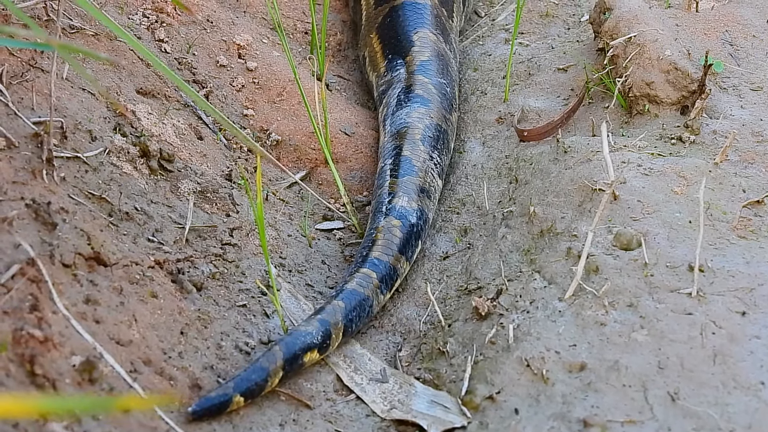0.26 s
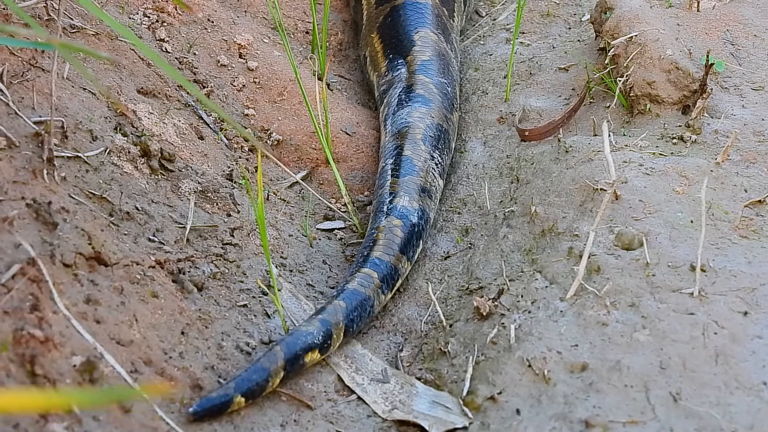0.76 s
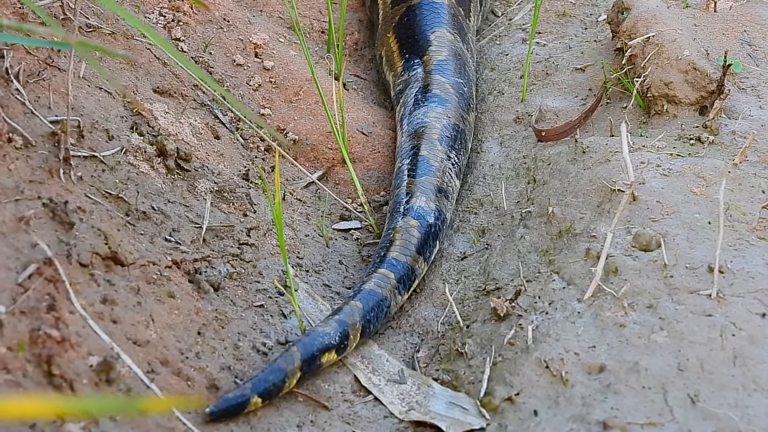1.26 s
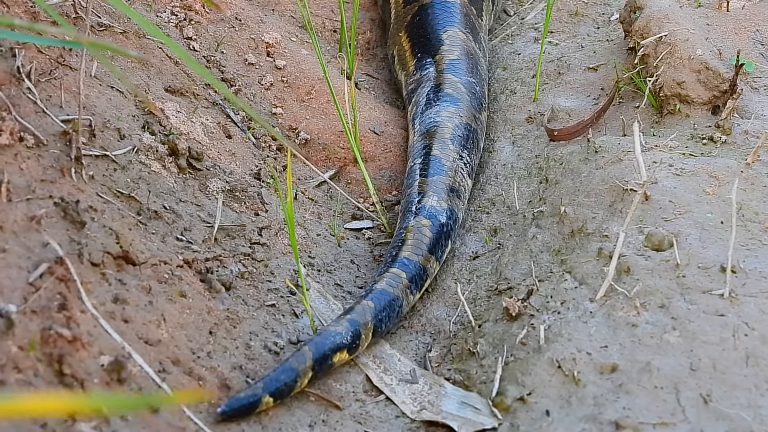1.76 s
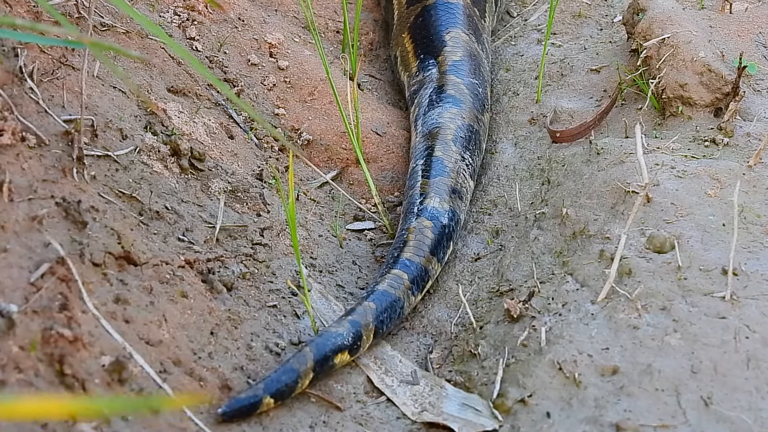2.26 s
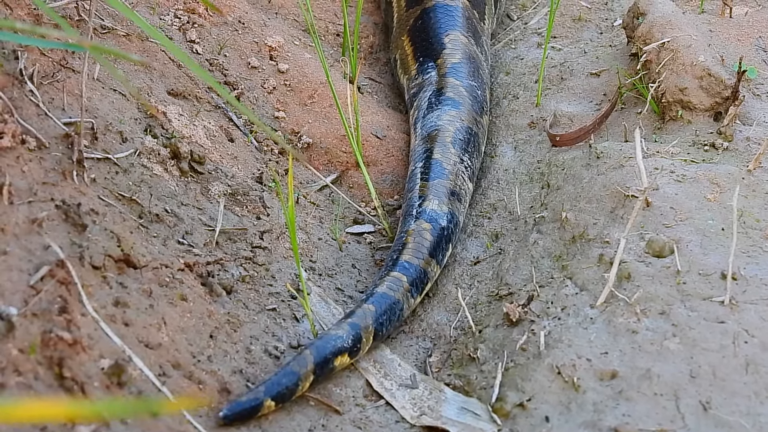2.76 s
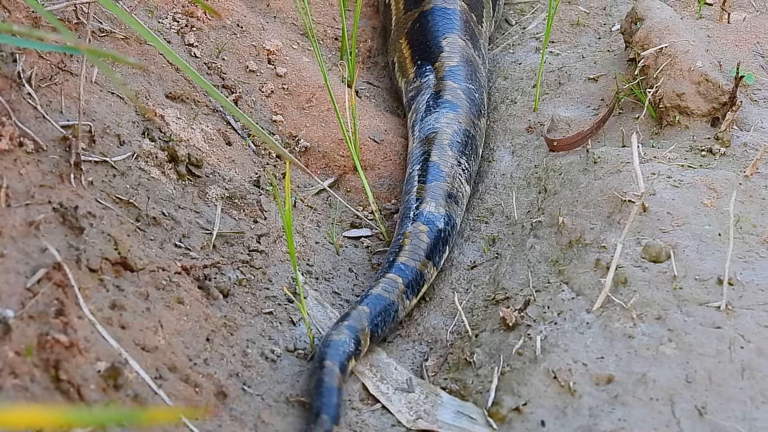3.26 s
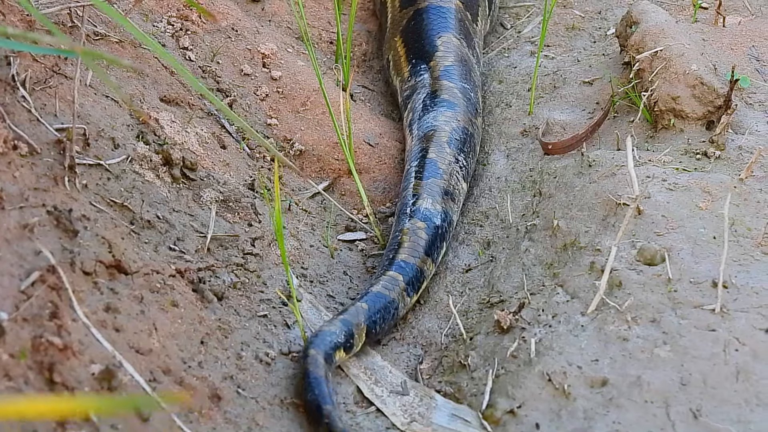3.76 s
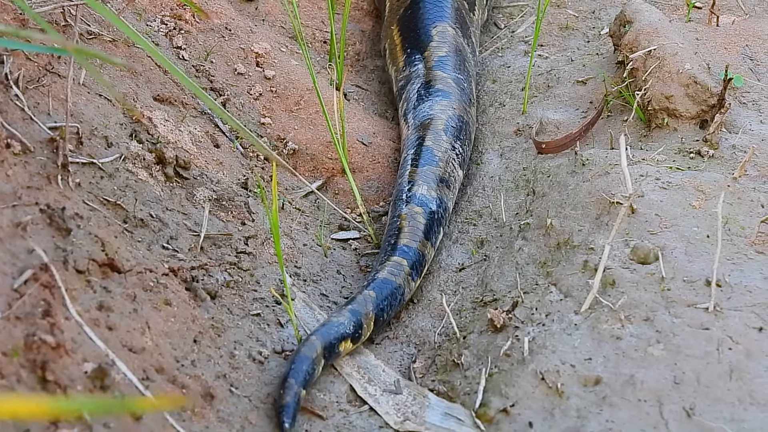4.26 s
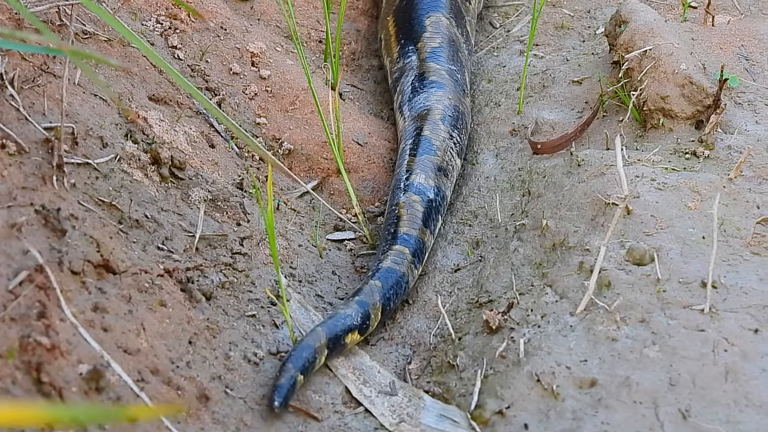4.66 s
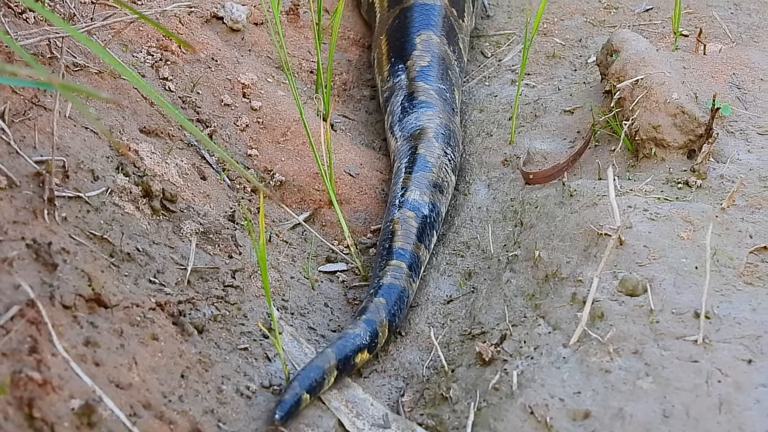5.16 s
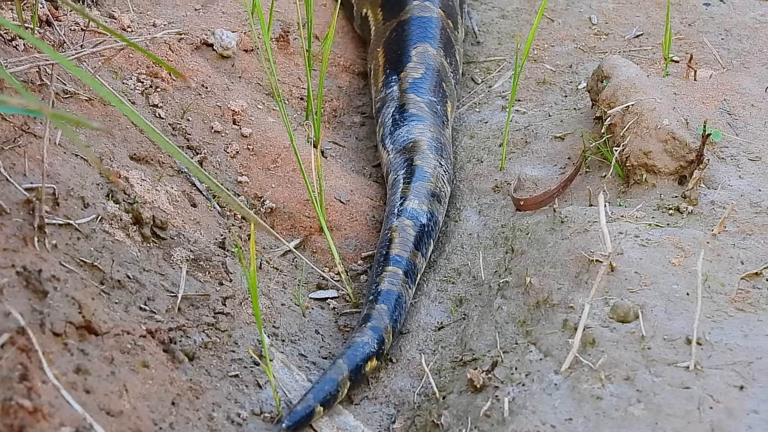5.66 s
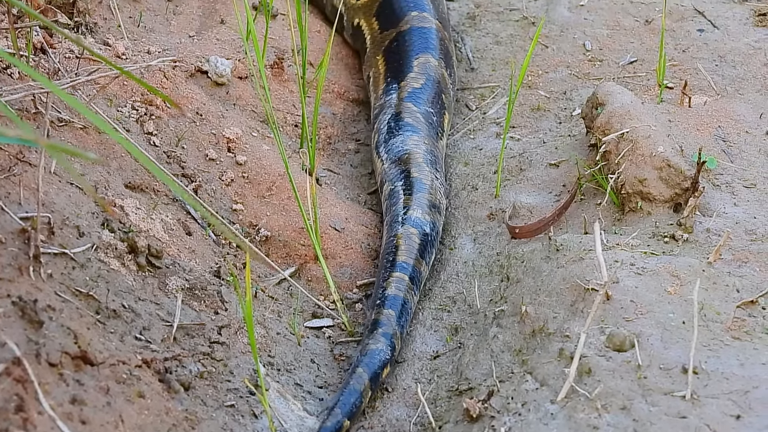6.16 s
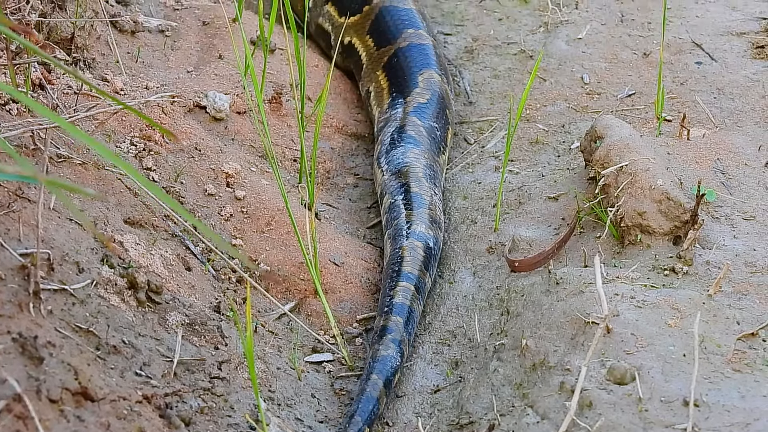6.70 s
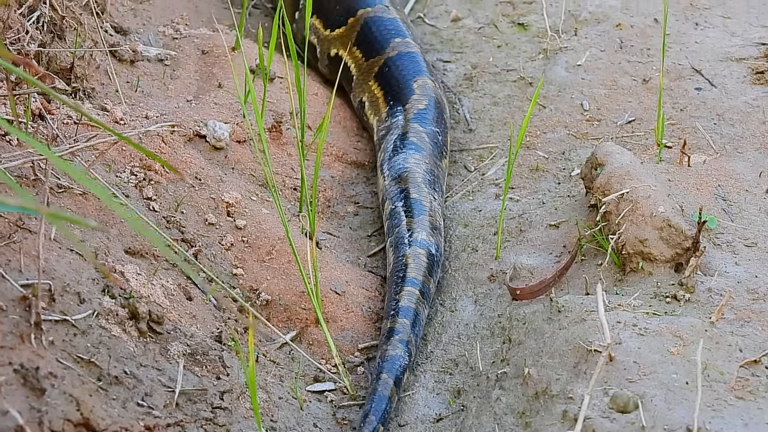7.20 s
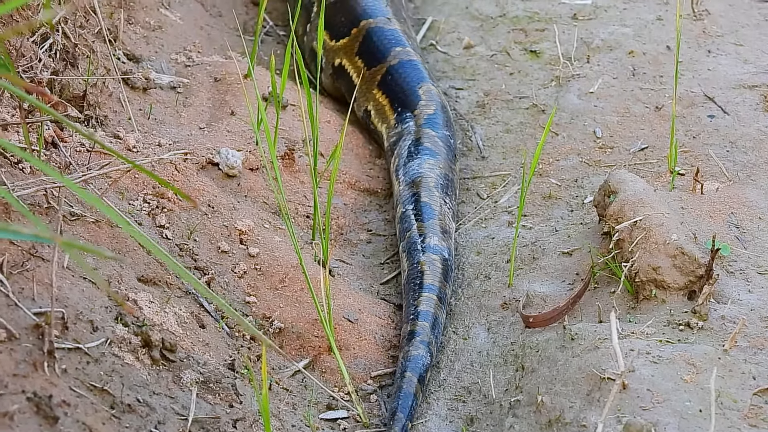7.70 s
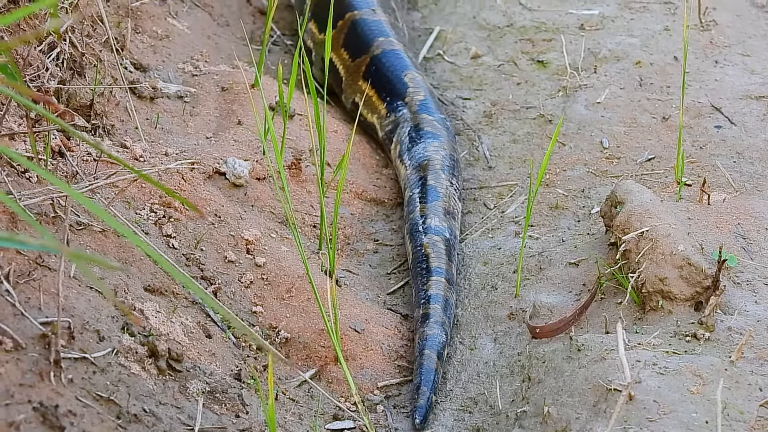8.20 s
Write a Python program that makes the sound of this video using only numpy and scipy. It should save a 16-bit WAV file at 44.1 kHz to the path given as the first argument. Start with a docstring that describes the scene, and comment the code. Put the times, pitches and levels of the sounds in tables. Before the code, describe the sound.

Outdoors, a close stereo microphone picks up the dry, irregular rustling of a big snake sliding over leaf litter and dirt. A few faint, high bird chirps come early, followed by one loud twig crack. The body keeps moving in short shoves, crunching and scraping, with the strongest surge late on and scattered small snaps to the end.

```python
"""A dry rustle swells close by: a large snake drags its body over leaves, grass and gritty soil.
Friction breaks the litter in countless tiny impulses, so each shove crunches, scrapes grit and brushes
stems; stick and slip rasps on something hollow, and twigs snap and ring now and then.
Behind it a bird whistles near-pure tones some way off, insects chirp and buzz in narrow high bands,
and the open air hisses faintly. A small stereo microphone picks it all up."""
import sys
import numpy as np
from scipy import signal
from scipy.fft import rfft, irfft
from scipy.io import wavfile

SR = 44100
rng = np.random.default_rng(int(sys.argv[2]) if len(sys.argv) > 2 else 0)


def dump_mix(stems):
    """Bounce the given channels to the path in sys.argv[1] as a 16-bit WAV at rate SR."""
    frames = np.atleast_2d(stems).T  # one column per channel
    limited = np.clip(frames, -1, 1)  # hard clip at full scale
    pcm = np.round(limited * 32767).astype(np.int16)
    wavfile.write(sys.argv[1], SR, pcm)


N = 372204
TIME_S = np.arange(N) / SR
PAN = np.array([[.5], [-.5]])   # shares a left-minus-right level, pan_db, between the channels


def from_db(db):
    """Decibels to amplitude ratio."""
    return 10 ** (np.asarray(db) / 20)


def unit_rms(x):
    """Normalisation to unit mean power."""
    return x / np.sqrt(np.mean(x ** 2) + 1e-20)


def in_time(rows):
    """Linear interpolation of each column over the times in the first."""
    time_s, *columns = np.transpose(rows)
    return [np.interp(TIME_S, time_s, column) for column in columns]


def drift(corner_hz):
    """Slow random modulation: noise twice through a one-pole low-pass, at unit rms."""
    pole = np.exp(-2 * np.pi * corner_hz / (SR / 10))
    slow = signal.lfilter([1], [1, -2 * pole, pole * pole], rng.standard_normal(N // 10 + 4002))[4000:]
    return np.interp(np.arange(N) / 10, np.arange(len(slow)), unit_rms(slow))


def colour(x, spectrum):
    """Minimum-phase filtering to a relative spectrum, at unit rms."""
    hz, level_db = np.transpose(spectrum)
    grid_hz = np.maximum(np.arange(1025) * SR / 2048, 1)
    gain = from_db(np.interp(np.log(grid_hz), np.log(hz), level_db))
    cepstrum = irfft(np.log(gain))
    cepstrum[1:1024] *= 2   # folding the cepstrum makes the response causal
    cepstrum[1025:] = 0
    response = irfft(np.exp(rfft(cepstrum)))
    return unit_rms(signal.oaconvolve(x, response[None], axes=1)[:, :N])


def roll_off(x, kind, corner_hz, order=2):
    """Maximally flat low-pass or high-pass filter."""
    return signal.sosfilt(signal.butter(order, corner_hz, kind, fs=SR, output="sos"), x)


def ring(x, hz, width_hz):
    """Damped two-pole resonator with unit peak gain."""
    r = np.exp(-np.pi * width_hz / SR)
    feedback = [1, -2 * r * np.cos(2 * np.pi * hz / SR), r * r]
    return signal.lfilter([(1 - r * r) / 2, 0, (r * r - 1) / 2], feedback, x)


def band(x, hz, width_hz):
    """Two equal resonators in cascade: a band with steeper skirts."""
    return ring(ring(x, hz, width_hz), hz, width_hz)


def stereo(mid, side, correlation):
    """Sum and difference of independent signals set the correlation of left and right."""
    return np.sqrt(1 + correlation) * mid + np.sqrt(1 - correlation) * side * [[1], [-1]]


def noise(samples=N):
    """Two independent channels of white noise."""
    return rng.standard_normal((2, samples))


# Spectrum of the open air: frequency_hz, relative_db
AIR_SPECTRUM = [(100, -70), (201, -1.5), (627, -2.5), (791, -1), (861, 3), (1130, -5), (3390, -3),
                (3930, -12), (9950, -30), (15500, -49)]
def air(level_db=-66):
    """Broadband noise: a distant outdoor hiss whose level drifts slowly."""
    hiss = colour(stereo(*noise(), correlation=.53), AIR_SPECTRUM)
    return hiss * from_db(level_db + 4.5 * drift(.45))


def cricket(pitch_hz=7640, chirps_per_s=16.7, first_peak_s=.06, end_s=.95, level_db=-74):
    """Amplitude modulation of a narrow noise band: faint regular chirps far off."""
    chirps = np.clip(np.cos(2 * np.pi * chirps_per_s * (TIME_S - first_peak_s)), 0, 1) * (TIME_S < end_s)
    return unit_rms(band(noise(), pitch_hz, 400)) * chirps * from_db(level_db)


def insect(pitch_hz=9660, start_s=7.09, end_s=7.84, fade_s=.06, level_db=-68):
    """A narrow throbbing buzz; modulation briefly parts it into sidebands 300 Hz either side."""
    envelope = np.clip(np.minimum(TIME_S - start_s, end_s - TIME_S) / fade_s, 0, 1)
    buzz = band(noise(), pitch_hz, 260)
    parted = (TIME_S > 7.285) & (TIME_S < 7.42)
    buzz *= np.where(parted, 2 * np.cos(2 * np.pi * 300 * TIME_S), 1)
    throb_db = 2.5 * drift(25)
    return unit_rms(stereo(*buzz, correlation=.25)) * from_db(level_db + throb_db) * envelope


# Contours of bird whistles, one list each: time_s, pitch_hz, level_db
BIRD_WHISTLES = [
    [(1.205, 5800, -75), (1.222, 7080, -53), (1.25, 6650, -52), (1.285, 6230, -45), (1.31, 6190, -52)],
    [(1.785, 6330, -60), (1.8, 6250, -44), (1.816, 6050, -49), (1.833, 6290, -43), (1.852, 6070, -51),
     (1.9, 6050, -57)],
    [(2.288, 6300, -71), (2.3, 7000, -50), (2.35, 6150, -45), (2.395, 5400, -54), (2.42, 5320, -55),
     (2.44, 5900, -49), (2.46, 7000, -47), (2.47, 7050, -60)],
]
# Contour of one farther whistle: time_s, pitch_hz, level_db
DISTANT_WHISTLE = [(5.12, 4750, -76), (5.15, 5150, -73), (5.19, 5650, -73), (5.22, 6050, -80)]
def bird(t60_s=.5):
    """Near-sine whistles, smeared into reverberation by scattering from the vegetation."""
    direct = np.zeros(N)
    flutter_db = 3.1 * drift(42)
    for rows in [*BIRD_WHISTLES, DISTANT_WHISTLE]:
        pitch_hz, level_db = in_time(rows)
        edges = np.clip(np.minimum(TIME_S - rows[0][0], rows[-1][0] - TIME_S) / .0074, 0, 1)
        tone = np.sqrt(2) * np.sin(2 * np.pi * np.cumsum(pitch_hz) / SR)
        direct += tone * edges * from_db(level_db + flutter_db)
    tail = noise(22000) * from_db(-60 * TIME_S[:22000] / t60_s)
    echoes = signal.oaconvolve(direct[None], tail, axes=1)[:, :N]
    return direct * from_db(-6 * PAN) + from_db(-30.5) * echoes


# Twigs and leaves snapping: start_s, ring_peak_db, ring_hz, knock_re_ring_db, crack_re_ring_db, pan_db
TWIG_SNAPS = [(0.382, -29.5, 1504, -40, -2, -1), (0.399, -37, 2070, -14, -3, -1),
              (1.36, -46.5, 1250, -5, 4, -2), (1.684, -43, 1810, -9, -5, -3),
              (2.531, -8.5, 2360, -9, -31, -4), (2.579, -25.5, 2460, -11, -11, -4),
              (2.697, -30.5, 2300, -18, 2, -3), (2.73, -32, 2050, -14, -16, -8),
              (2.856, -39.5, 2060, -4, -10, -6), (2.903, -37, 3130, -3, 1, -5),
              (3.034, -45, 1250, -10, -10, -8), (3.119, -45.5, 2030, -2, 2, -14),
              (3.158, -41.5, 2090, -13, -13, -10), (4.013, -41.5, 590, 0, -3, -1),
              (4.05, -46, 4000, -10, 13, 0), (4.109, -37, 700, 6, -5, -0.5), (4.122, -36, 763, 6, 3, 4),
              (4.14, -42, 1380, 6, 14, -1), (4.156, -38, 1940, -2, 8.5, -3), (4.245, -48, 2500, 7, 15.5, 5),
              (4.281, -39, 634, -11, -15, 0), (4.339, -35.5, 690, -3, -1, 1), (4.367, -32, 633, -5, -20, 1),
              (4.477, -39, 1330, -12, 9, 2), (4.518, -39, 634, -4, 5, 1), (4.58, -40.5, 620, -5, -15, 0),
              (4.622, -43, 640, -13, -15, 0), (4.715, -37.5, 684, 0, 0, -2), (4.772, -38, 650, -1, -19, 0),
              (4.828, -38.5, 630, 2, -15, 1), (4.967, -45.5, 1270, 8, -4, -1),
              (5.885, -45, 1300, -19, 1, -6), (5.973, -28.5, 3380, -19, -19, -7),
              (6.19, -40, 3280, -14, -11, -1), (6.202, -45, 3300, -14, -8, -2),
              (6.228, -33, 3180, -4, -1, -1), (6.889, -26.5, 3270, -13, -1, 4),
              (6.951, -23.5, 1970, 5, -10, -7.5), (7.009, -25.5, 3400, -9, -5, -19),
              (7.043, -32, 2320, 9, 0, 2), (7.051, -40.5, 1230, 15, -8, 0), (7.096, -41, 1310, 7, 12, 1),
              (7.303, -37.5, 3220, -13, -15, -2.5), (7.504, -32.5, 5200, -22, -20, -26),
              (7.507, -28.5, 1990, 5.5, 6, 0), (7.518, -34, 3860, -4, -12, -1),
              (7.688, -35, 4430, -2, -6, -2), (8.036, -43, 1320, 1, -6, -0.5),
              (8.087, -37.5, 2460, -1, -15, 0), (8.13, -37.5, 1460, 0.5, 1, 2),
              (8.167, -38, 2360, -3, -19, 0), (8.218, -42, 4800, -7, 7, -1),
              (8.237, -36, 2660, -11, -18, 1), (8.279, -34.5, 4860, -22, -15, -6)]
def snaps(samples=4000, first_break=40):
    """Brittle fracture: fibres break in milliseconds; the piece rings, knocks on the soil and cracks."""
    out, t = np.zeros((2, N + samples)), TIME_S[:samples]
    impulse = np.zeros((2, samples))
    impulse[:, first_break] = 1
    for start_s, peak_db, hz, knock_db, crack_db, pan_db in TWIG_SNAPS:
        thickness = from_db(.17 * (peak_db + 44))   # thicker pieces are louder, break slower, ring cleaner
        t60_s = .0085 * thickness
        fibres = stereo(*noise(samples), correlation=1) * (1 - np.exp(-8 * t / t60_s))
        fibres *= from_db(-60 * t / t60_s)
        fibres += 1.88 * np.abs(fibres).max() * impulse   # the first fibre breaks hardest
        tone = ring(ring(impulse, hz, hz / 9), hz, hz / 3 / thickness ** 1.8)
        body = band(fibres, 3300, 3500)
        knock = ring(ring(fibres, 940, 530), 830, 610)
        thump = ring(ring(fibres, 440, 260), 440, 360)
        crack = band(fibres, 3200, 5400)
        tone, body, knock, thump, crack = [p / np.abs(p).max() for p in (tone, body, knock, thump, crack)]
        impact = knock + from_db(-10) * thump
        snap = tone + from_db(-11) * body + from_db(knock_db) * impact + from_db(crack_db) * crack
        onset = round(start_s * SR)
        out[:, onset:onset + samples] += snap * from_db(peak_db + pan_db * PAN)
    return roll_off(out[:, :N], "low", 10500)


def grains(per_s, spread_db, smooth_db, correlation):
    """Shot noise: tiny breaks of uneven size over the smooth friction of scales."""
    sizes = from_db(spread_db * np.minimum(rng.exponential(1, (2, N)), 5)) * rng.choice([-1, 1], (2, N))
    breaks = unit_rms(sizes * (rng.random((2, N)) < per_s / SR))
    return stereo(*(breaks + from_db(smooth_db) * noise()), correlation)


def stick_slip(per_s, fade_s):
    """Relaxation: sudden rises at random moments that fade away; zero mean, unit rms."""
    slips = rng.uniform(.39, 1, N) * (rng.random(N) < per_s / SR)
    fading = np.tanh(signal.lfilter([1], [1, -np.exp(-1 / (fade_s * SR))], slips))
    return unit_rms(fading - fading.mean())


# Scales rasping over something hollow, and, in the widest rows, broad resonant bands that colour the rustle:
# start_s, end_s, ring_hz, width_hz, level_db, pan_db
RESONANT_RASPS = [(0.435, 1.24, 2570, 1440, -55.5, -2.5), (0.709, 0.738, 6500, 1200, -49.5, -6),
                  (2.14, 2.253, 2350, 455, -46, -6.5), (2.556, 2.765, 2030, 350, -52.5, -20),
                  (2.947, 3.024, 1120, 298, -56, -6), (3.683, 3.95, 3460, 600, -60, 1),
                  (4.015, 4.111, 603, 160, -52.5, 0), (4.153, 4.21, 740, 260, -45, 0),
                  (4.278, 4.33, 335, 151, -45.5, -1), (4.347, 4.613, 617, 100, -53.5, 1),
                  (4.618, 4.734, 600, 130, -50, 0), (4.774, 4.826, 820, 300, -48.5, 0),
                  (4.81, 4.877, 3430, 400, -57, -6), (4.969, 5.008, 3150, 350, -54, -7),
                  (5.909, 5.951, 3470, 300, -43.5, -2), (5.948, 6.052, 3320, 300, -50.5, -5),
                  (6.177, 6.35, 3340, 350, -51, -6), (6.357, 6.433, 3290, 400, -55, -5),
                  (6.604, 6.756, 820, 392, -41, 0), (6.649, 6.71, 1050, 250, -46, 3),
                  (6.73, 6.832, 3310, 130, -38, 1), (6.824, 6.922, 3300, 150, -39, 3),
                  (6.826, 6.936, 3790, 150, -41, -4), (6.895, 6.928, 1010, 200, -45, 2),
                  (6.942, 6.97, 432, 124, -32.5, 2), (6.991, 7.026, 500, 200, -32.5, -3),
                  (6.94, 7.024, 3900, 900, -36.5, -12.5), (7.172, 7.31, 1210, 505, -54.5, 1),
                  (7.523, 7.835, 4700, 1100, -58.5, -2)]
def rasps(wander_hz=30, attack_s=.003, release_s=.026):
    """Forced resonance: gritty slips excite a ring in bumps for the length of each stroke; narrow rings sound
    hollow, broad ones colour the rustle."""
    out = np.zeros((2, N))
    grit = grains(1500, spread_db=3.8, smooth_db=-2.5, correlation=.8)
    bumps_db = 3 * stick_slip(per_s=40, fade_s=.024)
    blend = np.pi / 4 * (1 + np.tanh(drift(18)))   # the ring wanders between two close pitches
    for start_s, end_s, hz, width_hz, level_db, pan_db in RESONANT_RASPS:
        span = slice(round(start_s * SR), min(round((end_s + .014) * SR), N))
        t = TIME_S[span]
        envelope = np.clip(np.minimum((t - start_s) / attack_s, (end_s - t) / release_s), 0, 1)
        slips = grit[:, span] * envelope * from_db(bumps_db[span])
        modes = (np.cos(blend[span]), hz - wander_hz), (np.sin(blend[span]), hz + wander_hz)
        rung = sum(ring(ring(slips * share, mode_hz, width_hz), mode_hz, 2 * width_hz)
                   for share, mode_hz in modes)
        out[:, span] += unit_rms(rung) * from_db(level_db + pan_db * PAN)
    return out


def crumbs(per_s=160, decay_s=.007, quality=3):
    """Damped resonance: bits of leaf and bark crumble at random, each ringing at one of 12 pitches."""
    pitches_hz = np.geomspace(900, 6500, 12)
    breaks = from_db(4.9 * np.minimum(rng.exponential(1, N), 3.2)) * (rng.random(N) < per_s / SR)
    pitch_index = rng.integers(0, len(pitches_hz), N)
    grit = stereo(*noise(), correlation=1)
    out = np.zeros((2, N))
    for k, hz in enumerate(pitches_hz):
        bursts = signal.lfilter([1], [1, -np.exp(-1 / (decay_s * SR))], breaks * (pitch_index == k) + 1e-18)
        out += ring(ring(grit * bursts, hz, hz / quality), hz, hz) / np.sqrt(hz)
    return unit_rms(out)


# Spectrum of crushed litter: frequency_hz, relative_db
CRUNCH_SPECTRUM = [(90, -57), (200, -4.5), (430, 0), (640, 2.5), (1100, -2.5), (1600, -7.5), (3000, -56.5),
                   (9000, -98)]
# Spectrum of a low rumble: frequency_hz, relative_db
RUMBLE_SPECTRUM = [(20, 1), (70, -27), (180, 6.5), (350, 6.5), (550, 2), (2000, -98)]
def litter_crunch(rumble_db):
    """Compression: litter breaks under the body, and a low rumble rises and falls with the crunch."""
    crunch = colour(grains(900, spread_db=2.8, smooth_db=4.7, correlation=.83), CRUNCH_SPECTRUM)
    rumble = colour(stereo(*noise(), correlation=.28), RUMBLE_SPECTRUM)
    return crunch + from_db(rumble_db) * rumble


# Spectrum of scraped grit: frequency_hz, relative_db
SCRAPE_SPECTRUM = [(500, -67), (1000, -1), (1600, 2.5), (2500, 4.5), (3700, 5), (4100, -3.5), (5500, -3),
                   (8000, -27), (15000, -94)]
# Spectrum of a dry leaf giving way: frequency_hz, relative_db
TICK_SPECTRUM = [(300, -25), (1000, 9), (4500, 23), (9000, -36), (12000, -61)]
def grit_scrape():
    """Sliding friction: dense impulses from grit, with sparse leaf ticks and crumbling bits."""
    grit = colour(grains(2500, spread_db=4.5, smooth_db=1, correlation=.71), SCRAPE_SPECTRUM)
    ticks = colour(grains(45, spread_db=.87, smooth_db=-46, correlation=1), TICK_SPECTRUM)
    return grit + from_db(-17) * ticks + from_db(-7) * crumbs()


# Spectrum of brushed grass: frequency_hz, relative_db
BRUSH_SPECTRUM = [(3000, -32), (4500, 9.5), (6000, 6.5), (8000, 4), (10500, 2.5), (13500, -8.5),
                  (15600, -35)]
def grass_brush(treble_db, crossover_hz=10000):
    """Light friction on stems: a fine hiss whose lower and upper bands flicker independently."""
    lower = colour(grains(5000, spread_db=4.4, smooth_db=.7, correlation=.3), BRUSH_SPECTRUM)
    upper = colour(grains(5000, spread_db=4.4, smooth_db=.7, correlation=.02), BRUSH_SPECTRUM)
    return (roll_off(lower, "low", crossover_hz) * from_db(1.3 * drift(45))
            + roll_off(upper, "high", crossover_hz) * from_db(treble_db + 2.5 * drift(8)))


def stroke_power(start_s, length_s, level_db, swell_db=0, attack_s=.007, release_s=.015):
    """Power envelope of one stroke: quick attack, steady swell or fall, exponential decay."""
    power = np.zeros(N)
    span = slice(round(start_s * SR), round((start_s + length_s + .2) * SR))
    age_s = np.maximum(TIME_S[span] - start_s, 0)
    shape = np.minimum(age_s / attack_s, 1) * np.exp(-np.maximum(age_s - length_s, 0) / release_s)
    power[span] = (shape * from_db(level_db + swell_db * np.minimum(age_s / length_s, 1))) ** 2
    return power


# Slow slide of the body: time_s, scrape_db, crunch_re_scrape_db, brush_re_scrape_db
BODY_SLIDE = [(0.0, -65.5, -2, -12), (0.3, -59.5, -5.5, -9.5), (0.45, -57, -2.5, -5), (1.0, -53, -2, -7),
              (1.25, -54, -6, -6), (1.5, -63.5, -3, -1), (1.59, -62.5, 0, -10), (1.7, -56.5, -8, -0.5),
              (2.05, -56, -7, -5.5), (2.8, -50.5, -7.5, -4), (3.4, -57.5, -3, -2.5),
              (3.45, -59.5, -3.5, -6.5), (3.93, -58.5, -4, -7.5), (4.0, -63.5, -3, -6),
              (4.6, -59.5, 2.5, -4), (5.22, -62.5, 4.5, -6), (5.28, -67, -2, -6.5), (6.5, -61, 2, -9),
              (7.4, -62, -3.5, -5.5), (7.6, -57.5, -2.5, 0), (7.92, -61.5, -2, 1.5), (8.0, -65.5, 3, -2),
              (8.2, -66.5, 1, 1), (8.44, -53, -11, -2)]
# Sudden shoves: start_s, length_s, scrape_db, swell_db, crunch_re_scrape_db, brush_re_scrape_db
BODY_SHOVES = [(1.319, 0.033, -56, 3.5, -13, -1), (1.453, 0.072, -56.5, -0.5, -5, -3),
               (1.677, 0.024, -51, -14, 4, 4), (1.75, 0.13, -62.5, 4.5, -22, 3),
               (2.052, 0.06, -56.5, 6, -9, 1.5), (2.122, 0.1, -44, -3.5, -10, -7),
               (2.341, 0.024, -47.5, 4, -15, -14), (2.409, 0.089, -47, -6, -7.5, -2),
               (2.527, 0.22, -38, -8.5, -9, -5), (2.812, 0.015, -48.5, -1, -1, -12),
               (2.943, 0.027, -49.5, 0.5, -16, -1.5), (3.045, 0.014, -60.5, -9, 13.5, 4),
               (3.115, 0.12, -64.5, 11, -22, -1), (4.014, 0.21, -48.5, -2.5, 3, -2.5),
               (4.241, 0.15, -57, 6, 2, 0.5), (4.397, 0.18, -52.5, 4.5, -2, -4),
               (4.682, 0.07, -52.5, -10, -1, -19), (4.75, 0.21, -53, -9, -0.5, -9),
               (4.966, 0.012, -54, 2, -3, -9), (5.051, 0.071, -62, 9, -2.5, -18),
               (5.885, 0.043, -46.5, 9.5, -5.5, -10), (5.95, 0.088, -53.5, 4, 3, -8.5),
               (6.177, 0.14, -54.5, 6, -0.5, -8.5), (6.362, 0.046, -54, -1, -0.5, -10),
               (6.539, 0.147, -51, 13.5, 0.5, -3.5), (6.688, 0.088, -45, 5.5, -5.5, -5.5),
               (6.768, 0.15, -50.5, 14, -8, -1), (6.926, 0.09, -41, 1.5, 2.5, 4.5),
               (7.038, 0.0067, -41.5, 6.5, 2.5, -6), (7.091, 0.022, -45.5, 1.5, -3, -7.5),
               (7.134, 0.16, -52.5, -6.5, -6.5, -1.5), (7.502, 0.052, -38, -24.5, -3, 3),
               (8.021, 0.13, -51, 2.5, -4, -15), (8.166, 0.011, -48.5, 0.5, -9, -5),
               (8.231, 0.063, -44.5, -10, -5.5, -7.5), (8.321, 0.026, -50.5, -0.5, -9, -6)]
# Grass stems swishing past the scales: start_s, length_s, level_db
STEM_SWISHES = [(0.681, 0.071, -48.5), (1.153, 0.052, -55.5), (1.495, 0.025, -51), (1.8, 0.031, -56),
                (2.281, 0.02, -51), (2.416, 0.015, -58), (2.815, 0.014, -44.5), (3.306, 0.035, -50.5),
                (4.351, 0.015, -46), (4.695, 0.013, -52.5), (4.969, 0.012, -49.5), (5.088, 0.02, -55),
                (7.784, 0.029, -63)]
def efforts():
    """Incoherent sources add in power: slide, shoves and swishes set the scrape, crunch and brush gains."""
    slide_db, crunch_db, brush_db = in_time(BODY_SLIDE)
    scrape, crunch, brush = from_db([slide_db, slide_db + crunch_db, slide_db + brush_db]) ** 2
    for start_s, length_s, level_db, swell_db, crunch_db, brush_db in BODY_SHOVES:
        scrape += stroke_power(start_s, length_s, level_db, swell_db)
        crunch += stroke_power(start_s, length_s, level_db + crunch_db, swell_db)
        brush += stroke_power(start_s, length_s, level_db + brush_db, swell_db)
    brush += sum(stroke_power(*swish) for swish in STEM_SWISHES)
    return np.sqrt([scrape, crunch, brush])


# Ground under the body: time_s, pan_db, brush_treble_db, rumble_re_crunch_db
GROUND_PATH = [(0.0, -1, -17, -0.5), (0.77, -2, 1.5, -26), (1.86, -1, -13, -8), (2.49, -2.5, 2, -51),
               (3.34, -1.5, -22, -20), (4.23, -3, -33, 0), (4.98, -1.5, -30, -6), (6.77, -2, -8, -11),
               (6.98, -4, -5, -7), (7.2, -1.5, -1, -6), (8.44, -1, -8, -8)]
def crawl():
    """Amplitude modulation: crunch, scrape and brush follow the body's effort and flicker on their own."""
    scrape_gain, crunch_gain, brush_gain = efforts()
    pan_db, treble_db, rumble_db = in_time(GROUND_PATH)
    crunch = litter_crunch(rumble_db) * crunch_gain
    scrape = grit_scrape() * scrape_gain
    brush = grass_brush(treble_db) * brush_gain
    return (crunch * from_db(1.78 * drift(60))
            + scrape * from_db(1.47 * drift(23.4) + pan_db * PAN)
            + brush * from_db(pan_db * PAN))


def scene(lag_samples=2):
    """Superposition; close sounds reach the left microphone port a little later than the right."""
    snake = crawl() + rasps() + snaps()
    snake[0] = np.roll(snake[0], lag_samples)
    return snake + bird() + insect() + cricket() + air()


def record(dry, bass_hz=110, stopband_hz=16004):
    """Band limiting: the bass rolls off gently and the top is cut steeply."""
    thin = roll_off(dry, "high", bass_hz, order=1)
    return signal.sosfilt(signal.cheby2(16, 70, stopband_hz, fs=SR, output="sos"), thin)


dry = scene()
out = record(dry)
dump_mix(out)
```